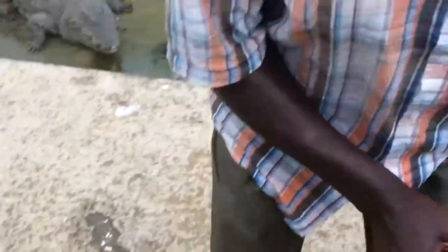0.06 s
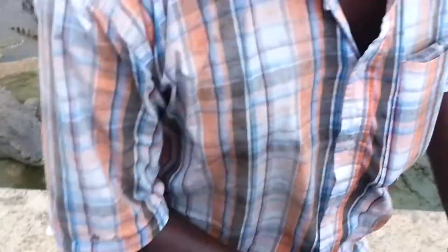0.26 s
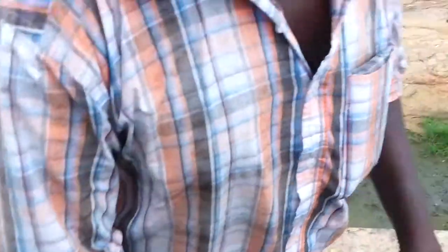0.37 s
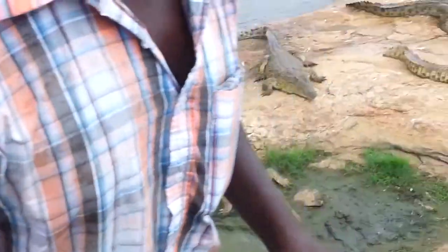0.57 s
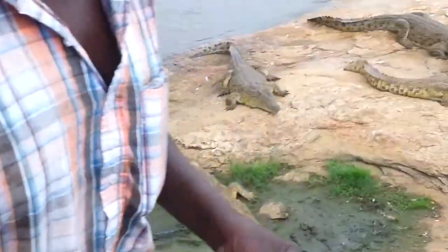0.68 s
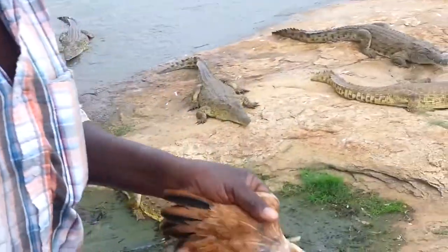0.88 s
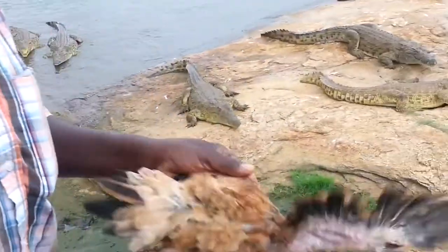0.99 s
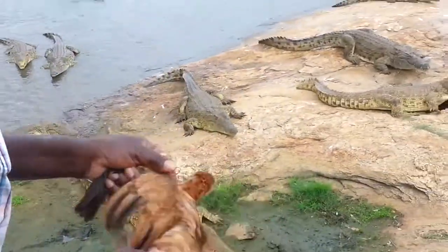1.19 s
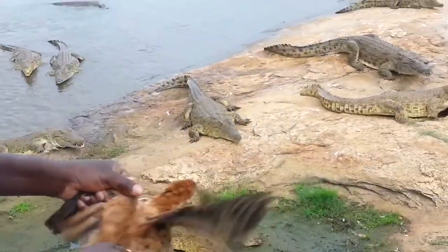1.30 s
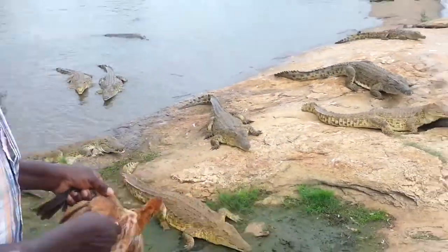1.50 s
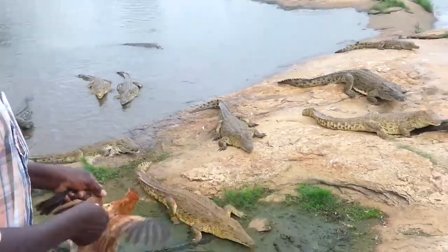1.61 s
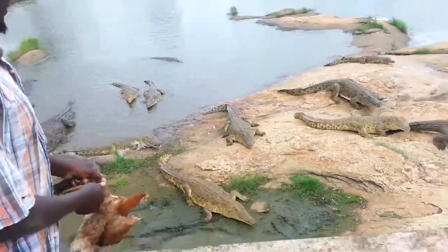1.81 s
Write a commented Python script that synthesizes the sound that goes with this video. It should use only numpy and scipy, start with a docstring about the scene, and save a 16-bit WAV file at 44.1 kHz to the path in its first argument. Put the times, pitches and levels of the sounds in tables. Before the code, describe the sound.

Close, hoarse chicken squawks, one long and two shorter, with light wing bumps outdoors.

```python
"""A faint outdoor hush beside a pond, then two thin peeps and the bump of a wing.
A hen, held by the legs close by, gives three harsh squawks, the first the longest. Her voice breaks
back and forth between a chaotic rasp (irregular pulses ringing the windpipe) and clean, brassy notes
(the pulses lock). Feathers rustle and wings bump in between; at the end she starts a fourth squawk."""
import sys
import numpy as np
from scipy import signal
from scipy.fft import rfft, irfft
from scipy.io import wavfile
from scipy.ndimage import uniform_filter1d

SR = 44100
rng = np.random.default_rng(int(sys.argv[2]) if len(sys.argv) > 2 else 0)


def wav_out(sig):
    """Save sig, one row per channel (or a flat mono array), as 16-bit PCM at SR to the path in sys.argv[1]."""
    wavfile.write(sys.argv[1], SR, np.round(np.clip(np.atleast_2d(sig).T, -1, 1) * 32767).astype(np.int16))


N = 81585
T = np.arange(N) / SR
HZ = np.fft.rfftfreq(N, 1 / SR)

# The colour of rubbing feathers. Each row: frequency in Hz, relative level in dB.
FEATHER_COLOUR = [(100, -5), (300, -0.5), (1100, 3.5), (4800, 5.5), (8000, -2), (16000, -19)]


def amp(db):
    return 10 ** (np.asarray(db) / 20)


def unit(x):
    return x / np.sqrt(np.mean(x ** 2) + 1e-20)


def curve(points):
    """A line through (seconds, value) points."""
    return np.interp(T, *np.transpose(points))


def gate(start, end, ramp_s=0.009):
    """Open between two times, with short ramps."""
    return np.clip((T - start) / ramp_s + .5, 0, 1) - np.clip((T - end) / ramp_s + .5, 0, 1)


def wander(hz):
    """Random motion up to a rate."""
    return unit(irfft(rfft(rng.standard_normal(N)) / (1 + (HZ / hz) ** 4), N))


def eq_curve(table, column=1):
    """One column of a colour table at every frequency."""
    rows = np.array(table, float)
    return np.interp(np.log(HZ + 1), np.log(rows[:, 0]), rows[:, column])


def colour(x, db):
    """Minimum-phase EQ: it rings only after the sound."""
    cepstrum = irfft(np.maximum(db, -100) * np.log(10) / 20, N)
    fold = np.r_[1, np.full(N // 2, 2), np.zeros(N - N // 2 - 1)]
    taps = irfft(np.exp(rfft(cepstrum * fold)), N)[:2048]
    return signal.oaconvolve(np.atleast_2d(x), taps[None], axes=1)[:, :N]


def noise(db, shared):
    """Coloured noise, partly shared by both ears."""
    centre = np.sqrt(shared) * rng.standard_normal(N)
    sides = np.sqrt(1 - shared) * rng.standard_normal((2, N))
    return unit(colour(centre + sides, db))


def steady(x):
    """Evens out the level over 20 ms."""
    return x / np.sqrt(abs(uniform_filter1d((x ** 2).mean(0), 882)) + 1e-14)


def hush():
    """Low, gently wavering outdoor air; its level dips while the long squawk sounds."""
    # Each row: frequency in Hz, relative level in dB.
    air_colour = [(25, -41.5), (250, -5.5), (600, -12), (2000, -43), (15000, -26)]
    # Each row: time in seconds, level in dB.
    fader = [(.27, -42.5), (.46, -68.5), (.76, -55), (.95, -42), (1.55, -48.5)]
    return noise(eq_curve(air_colour), shared=0.77) * amp(curve(fader) + 2 * wander(15))


def echoes(x, t60):
    """A dying scatter of reflections, different at each ear."""
    t = T[:SR // 2]
    tail = rng.standard_normal((2, len(t))) * amp(-60 * t / t60) * (t > .001)
    return signal.oaconvolve(x, tail / np.linalg.norm(tail, axis=1, keepdims=True), axes=1)[:, :N]


def rustle():
    """Feathers and cloth rub in uneven bursts."""
    # Each row: time in seconds, level in dB.
    rubbing = [(.13, -39), (.17, -46), (.7, -79), (.95, -38), (1.2, -37), (1.52, -30.5), (1.6, -35.5),
               (1.72, -42.5)]
    return noise(eq_curve(FEATHER_COLOUR), shared=0.12) * amp(curve(rubbing) + 2.2 * wander(146))


def bumps():
    """Wings and hand bump: a brush of feathers with a dull thud."""
    # Each row: time in seconds, decay in seconds, brush in dB, thud in dB, thud's corner in Hz.
    hits = [(0.093, 0.0064, -29, -70, 600), (1.034, 0.01, -30.5, -44.5, 110),
            (1.164, 0.011, -24.5, -27, 866)]
    brush = noise(eq_curve(FEATHER_COLOUR), shared=0.64)
    out = np.zeros((2, N))
    for time, decay, brush_db, thud_db, thud_hz in hits:
        age = 2 * np.maximum(T - time + 0.0028, 0) / decay  # the hit peaks at age 1
        thud_band = (HZ + 1) / thud_hz / (1 + (HZ / thud_hz) ** 2) ** 1.41
        thud = noise(20 * np.log10(thud_band), shared=0.81)
        out += age * np.exp(1 - age) * (amp(brush_db) * brush + amp(thud_db) * thud)
    return out


def peeps():
    """Short rising squeaks, a little to the right, strongest in the third partial."""
    # Each row: start in seconds, length in seconds, first and last pitch in Hz, level in dB.
    squeaks = [(0.035, 0.012, 1462, 1598, -18.5), (0.0554, 0.01, 1500, 1670, -17)]
    # Each partial's level in dB, from the fundamental up.
    partials_db = [-23.5, -16.5, -2, -10.5, -36]
    out = np.zeros(N)
    for start, length, from_hz, to_hz, level_db in squeaks:
        progress = np.clip((T - start) / length, 0, 1)
        turns = np.cumsum(from_hz + (to_hz - from_hz) * progress) / SR
        tone = sum(amp(db) * np.sin(2 * np.pi * k * turns) for k, db in enumerate(partials_db, 1))
        out += amp(level_db) * np.sin(np.pi * progress) * tone
    return out * amp([[-1.5], [1.5]])


def pulses(hz, smear=0, count=16):
    """One pulse per cycle, sharp or smeared, and the running count of cycles."""
    turns = np.cumsum(hz) / SR
    partials = (np.cos(2 * np.pi * k * turns + smear * np.pi * k * k / count) for k in range(1, count + 1))
    return unit(sum(partials)), turns


def windpipe(x, hz, width_hz=130):
    """A windpipe resonance that follows a curve."""
    carrier = np.exp(2j * np.pi * np.cumsum(hz) / SR)
    pole = np.exp(-np.pi * width_hz / SR)
    return 2 * (carrier * signal.lfilter([1 - pole], [1, -pole], x / carrier)).real


def chaotic_rasp(hz):
    """Irregular pulses and puffs of air ring the windpipe, at the pitch and higher up."""
    # The upper resonance moves as the neck stretches. Each row: time in seconds, frequency in Hz.
    upper_ring = [(.27, 2110), (.40, 1960), (.52, 2240), (1.03, 2110), (1.26, 2000), (1.35, 2330)]
    chaos, turns = pulses(hz * (1 + 0.1 * wander(444)), smear=0.96)
    puffs = unit(np.exp(-2 * (turns % 1)) * rng.standard_normal(N))
    flutter = np.exp(0.19 * wander(169))
    rasp = unit((chaos + amp(-1) * puffs) * flutter)
    return rasp + amp(-2) * windpipe(rasp, hz) + windpipe(rasp, curve(upper_ring))


def syrinx():
    """The voice's source, as rasp and tone: in the notes it locks into even or strong-weak pulses."""
    # Each row: time in seconds, pitch in Hz.
    melody = [(.19, 878.3), (.39, 1003), (.52, 899.5), (.58, 780.8), (.645, 739), (.705, 725), (.76, 764.3),
              (.91, 746), (1.0, 757.9), (1.084, 796.6), (1.13, 724), (1.22, 967.7), (1.355, 1012),
              (1.39, 796.3), (1.438, 794), (1.449, 833), (1.473, 874.4), (1.488, 778), (1.80, 1013)]
    # Each row: start and end in seconds, rasp left under the note in dB, strong-weak depth in dB.
    clean_notes = [(.622, 0.713, -19.5, -40), (.759, 0.854, -35.5, -35), (1.047, 1.106, -9, -26),
                   (1.402, 1.446, -7, -10.5), (1.453, 1.509, -20.5, -25)]
    hz = curve(melody)
    tone_floor, lead_s, hold_s = amp(-15), 0.039, 0.0067
    rasp_gain, tone_gain, doubling, core_gate = 1, tone_floor, 0, 0
    for start, end, rasp_db, doubling_db in clean_notes:
        lock = gate(start, end)
        rasp_gain += lock * (amp(rasp_db) - 1)
        tone_gain += lock * (1 - tone_floor)
        doubling += lock * amp(doubling_db)
        # The fundamental locks before each note and holds on just after it.
        core_gate = np.maximum(core_gate, gate(start - lead_s, end + hold_s))
    waver = 0.006 * (1 + 2 * rasp_gain) * wander(70)
    tone, turns = pulses(hz * (1 + waver))
    shimmer = 1 + 0.1 * wander(70)
    tone *= (1 + doubling * np.cos(np.pi * turns)) * shimmer
    core = amp(-11.5) * core_gate * rasp_gain * np.cos(2 * np.pi * turns)
    rasp = chaotic_rasp(hz)
    treble = irfft(rfft(rasp) * HZ ** 6 / (HZ ** 6 + 6300 ** 6), N)
    hoarse = amp(-7) * treble * (1 - rasp_gain)  # the top stays rough during the notes
    return rasp * rasp_gain + hoarse, tone * tone_gain + core


def squawk(rasp, tone, effort, throat, leftward):
    """The throat colours the source, effort sets level and fullness; ear gain and delay place it."""
    chest_hz, split_hz, full_left_lead_s = 600, 1965, 0.00093
    chest_leak = amp(2.5) * (HZ / (HZ + chest_hz)) ** 2
    low_cut = 1 / (1 + (chest_hz / (HZ + 1)) ** 8)
    chest_db = 20 * np.log10(chest_leak + low_cut + 1e-6)
    voice = colour(rasp, eq_curve(throat, 1) + chest_db) + colour(tone, eq_curve(throat, 2) + chest_db)
    ears = np.array([[.5], [-.5]])
    ear_delay = np.exp(2j * np.pi * HZ * ears * leftward * full_left_lead_s)
    spectrum = rfft(voice) * amp(ears * eq_curve(throat, 3)) * ear_delay
    crossover = 1 / (1 + (HZ / split_hz) ** 16)
    body = steady(irfft(spectrum * crossover, N))
    bite = steady(irfft(spectrum * (1 - crossover), N))
    times, level_db, body_db = np.transpose(effort)
    body_share = np.clip(amp(np.interp(T, times, body_db)) ** 2, 0, 1)
    voice = np.sqrt(body_share) * body + np.sqrt(1 - body_share) * bite
    return voice * amp(np.interp(T, times, level_db, left=-200, right=-200))


def hen():
    """Three squawks and the faint start of a fourth, as the bird swings from the left to the middle."""
    # Effort. Each row: time in seconds, level in dB, the low band's share of the power in dB.
    long_effort = [(0.194, -33, 9), (0.197, -11.5, -13.5), (.39, -9.5, -12), (0.611, -12, -9.5),
                   (0.666, -10.5, -8), (0.727, -12.5, -4.5), (0.783, -9, -3), (0.907, -13.5, -3.5),
                   (0.923, -41, 0)]
    short_effort = [(0.98, -26, -31), (0.997, -11, 0), (1.052, -6.5, -10.5), (1.078, -9.5, -9.5),
                    (1.10, -8.5, -12), (1.133, -21, -2.5), (1.147, -40, -4)]
    third_effort = [(1.217, -26, 0.5), (1.236, -16.5, -7.5), (1.29, -12.5, -7), (1.307, -5.5, -26),
                    (1.315, -12, -7.5), (1.425, -10, -12), (1.446, -7.5, -19.5), (1.449, -14.5, -7),
                    (1.48, -12, -11.5), (1.496, -12.5, -1.5), (1.509, -41, -24)]
    faint_effort = [(1.748, -36.5, 0), (1.852, -23.5, -10.5)]
    # Throat and open beak. Each row: frequency in Hz, then rasp, tone and left minus right in dB.
    long_throat = [(590, -12, -10.5, 0.5), (983, -7, -12, -2), (1350, -5.5, 4, -4.5),
                   (1530, -6.5, -15, -16.5), (2335, 4.5, 9.5, 3), (3070, 1, 0.5, 10),
                   (3650, -0.5, 5.5, -4.5), (4310, -16.5, -11, 18.5), (4720, -12.5, -17, -21.5),
                   (5270, -16, -2.5, 0), (5740, -18, -15, -7.5), (7550, -17, -13.5, -7),
                   (12350, -57, -48.5, -22)]
    short_throat = [(710, -12.5, -2, -0.5), (1130, 3, 3, 1), (1650, -4.5, -5, -12), (2100, -1, 6, 1.5),
                    (3000, -5.5, 2, 11), (3650, -4, -9.5, -7), (4900, -8.5, -6.5, 0.5),
                    (6150, -21, -17.5, -14), (8960, -24, -29, -14), (15500, -51, -66, -32)]
    late_throat = [(595, -21, -16, 7), (995, -5.5, -3, -5.5), (1550, -3.5, -3, 5), (2180, 0.5, 7, 0),
                   (3223, 0.5, 11, -2), (3156, -1, 0.5, -16), (4180, -3, 1, 9), (5100, -9.5, -7.5, -11),
                   (6050, -24, -13.5, -8.5), (8670, -42, -18.5, -16), (12600, -76, -50, -17)]
    rasp, tone = syrinx()
    return (squawk(rasp, tone, long_effort, long_throat, leftward=0.23)
            + squawk(rasp, tone, short_effort, short_throat, leftward=0.064)
            + squawk(rasp, tone, third_effort, late_throat, leftward=0.017)
            + squawk(rasp, tone, faint_effort, late_throat, leftward=-0.078))


def scene():
    """Hen, peeps and bumps up front with near and far reflections, over the rustle and the hush."""
    close = hen() + peeps() + bumps()
    air = hush()
    reflections = amp(-12) * echoes(close, t60=0.021) + amp(-21) * echoes(close, t60=0.28)
    return close + reflections + rustle() + air


def record(dry):
    """The top end is dulled, peaks over full scale clip, and a steep low-pass follows."""
    dull_hz, edge_hz = 11500, 15500
    dull = irfft(rfft(dry) / np.sqrt(1 + (HZ / dull_hz) ** 14), N)
    low_pass = signal.firwin(255, edge_hz, window=("kaiser", 8), fs=SR)
    return signal.oaconvolve(np.clip(dull, -1, 1), low_pass[None], "same")


dry = scene()
out = record(dry)
wav_out(out)
```